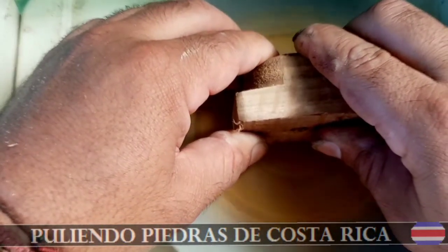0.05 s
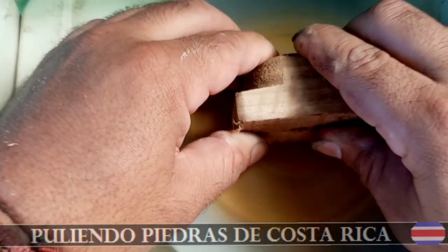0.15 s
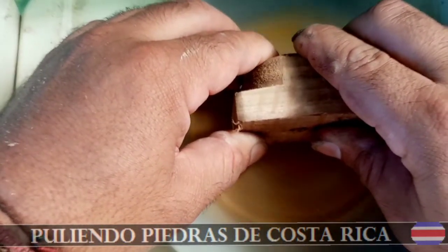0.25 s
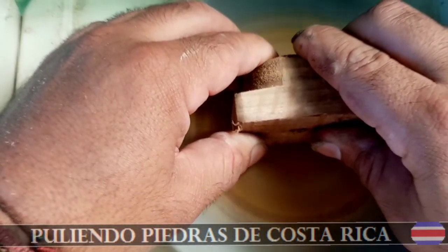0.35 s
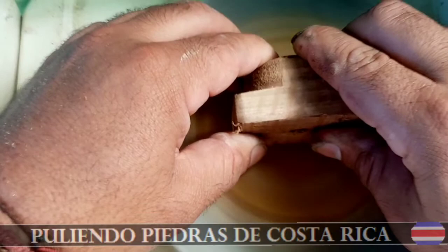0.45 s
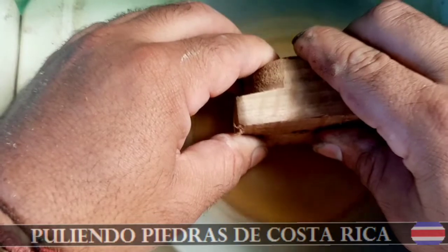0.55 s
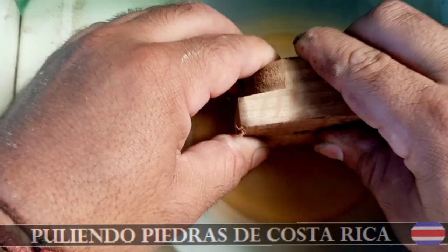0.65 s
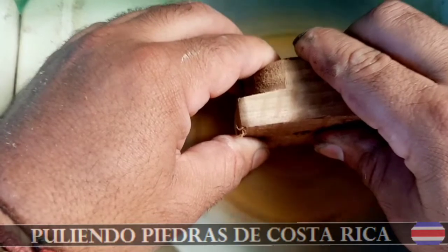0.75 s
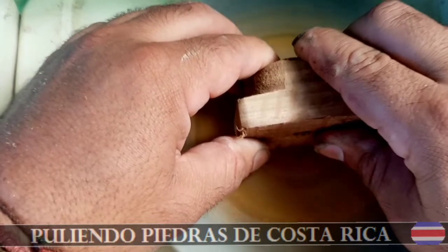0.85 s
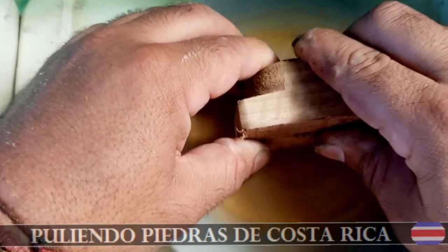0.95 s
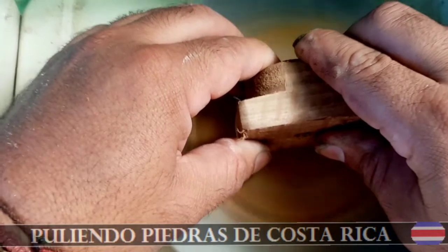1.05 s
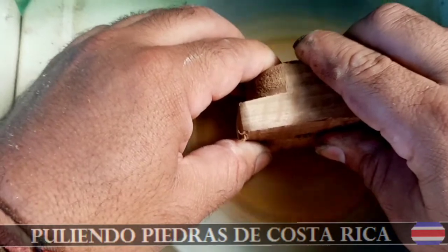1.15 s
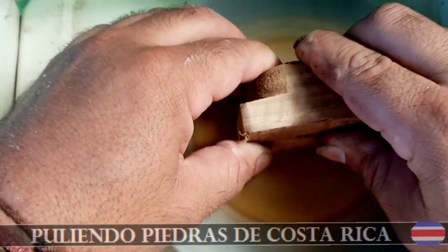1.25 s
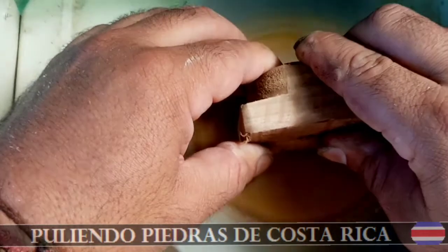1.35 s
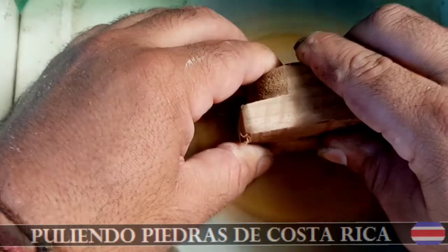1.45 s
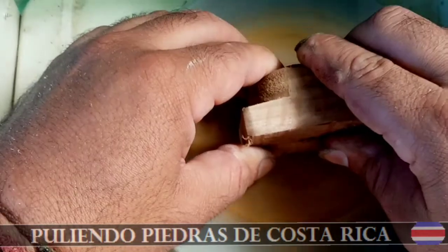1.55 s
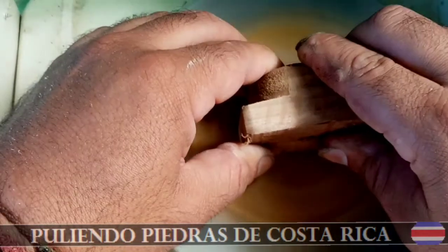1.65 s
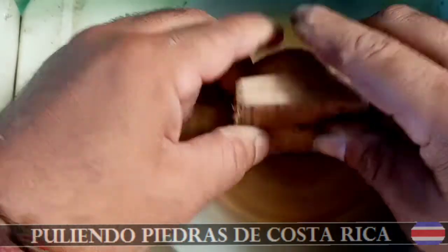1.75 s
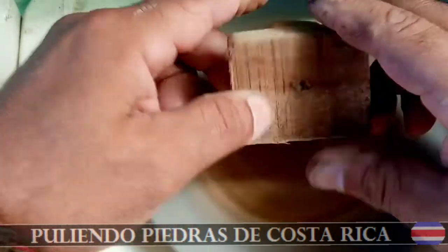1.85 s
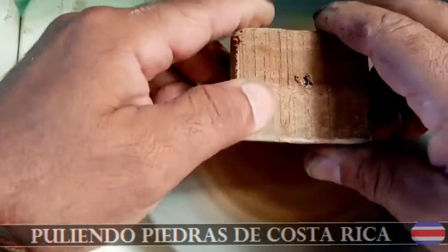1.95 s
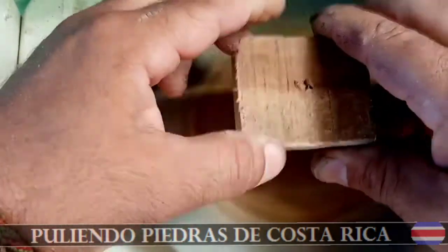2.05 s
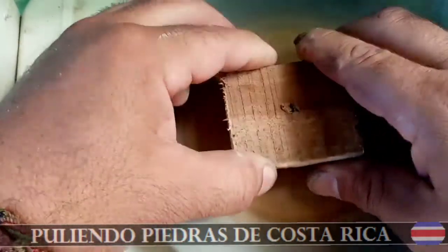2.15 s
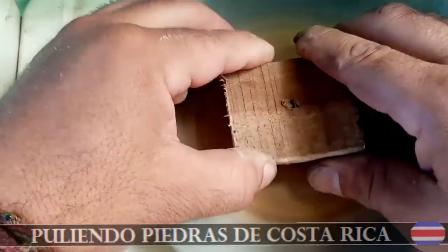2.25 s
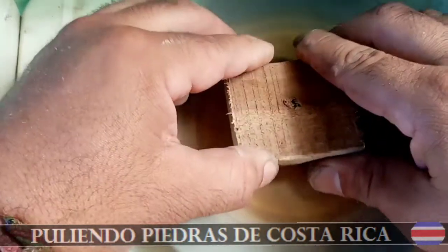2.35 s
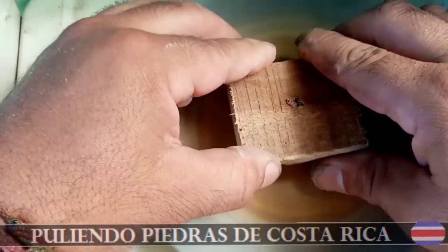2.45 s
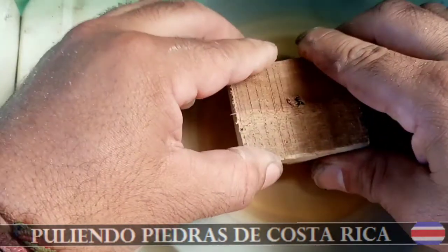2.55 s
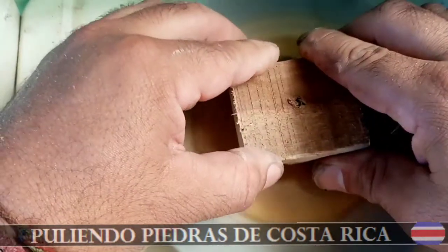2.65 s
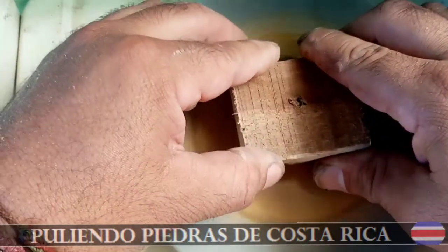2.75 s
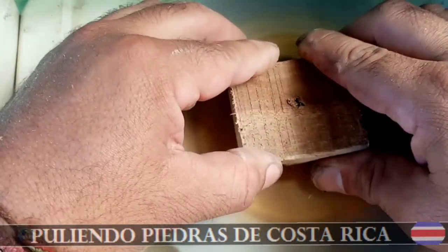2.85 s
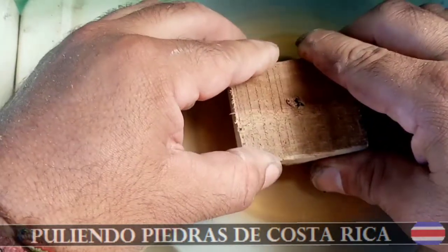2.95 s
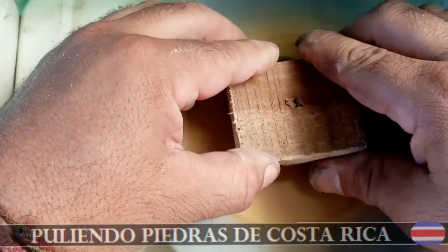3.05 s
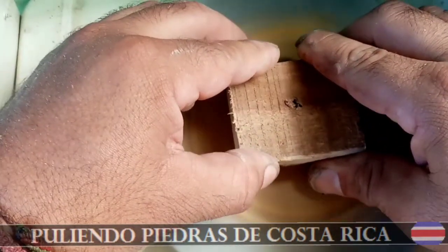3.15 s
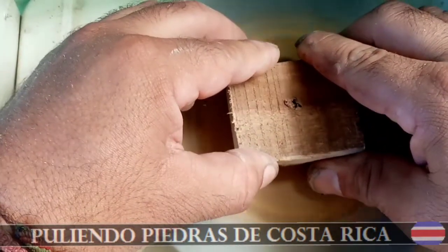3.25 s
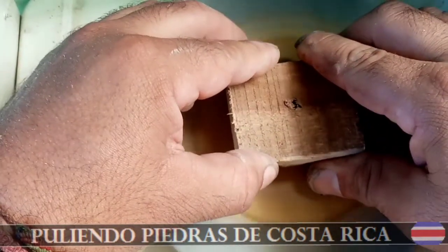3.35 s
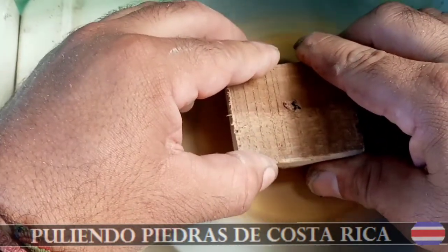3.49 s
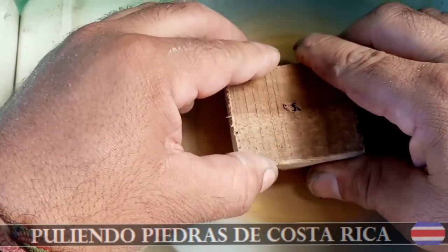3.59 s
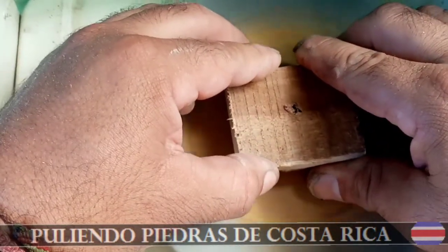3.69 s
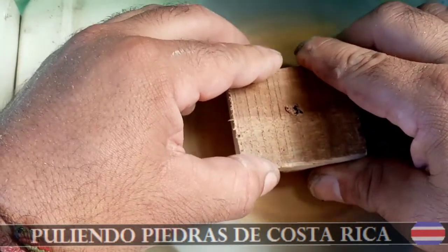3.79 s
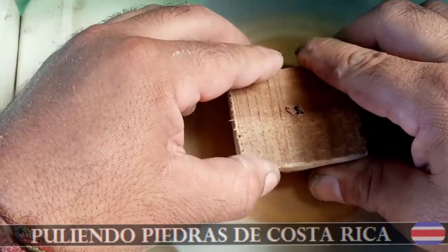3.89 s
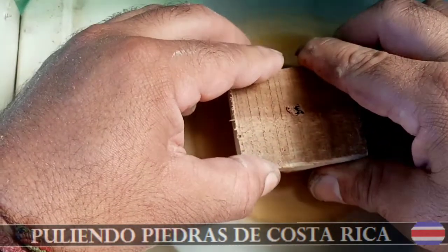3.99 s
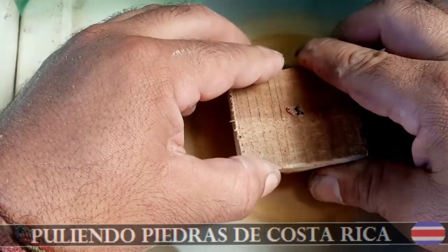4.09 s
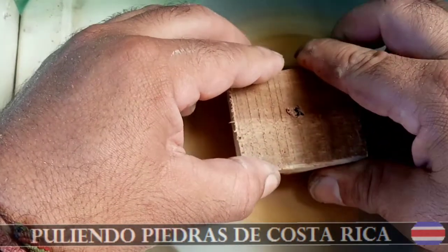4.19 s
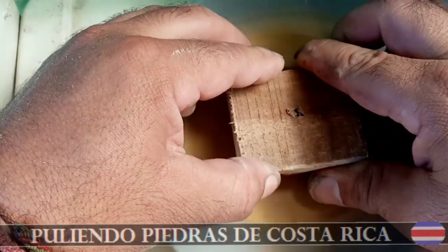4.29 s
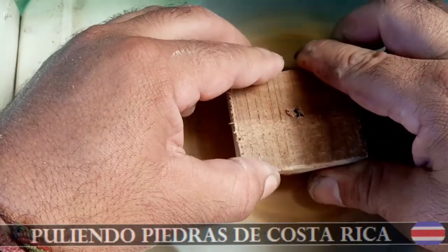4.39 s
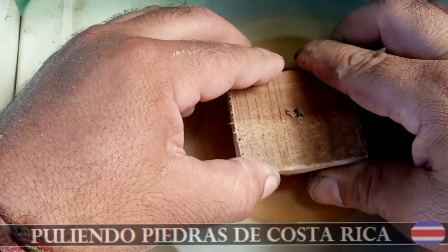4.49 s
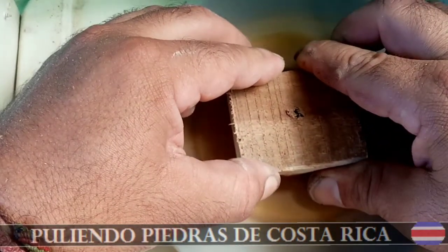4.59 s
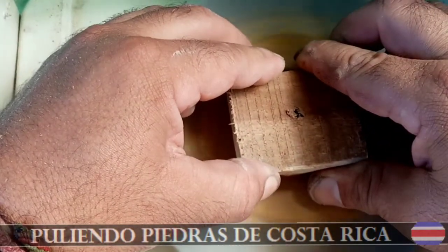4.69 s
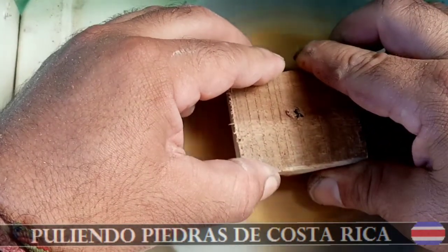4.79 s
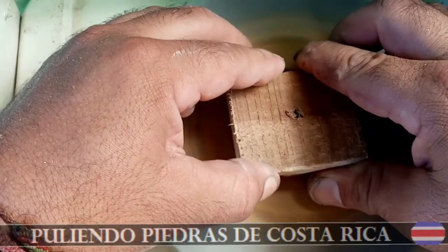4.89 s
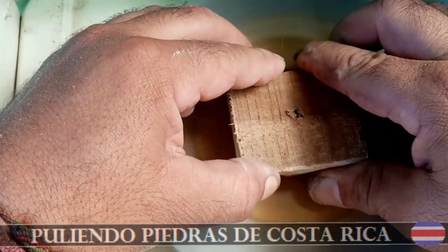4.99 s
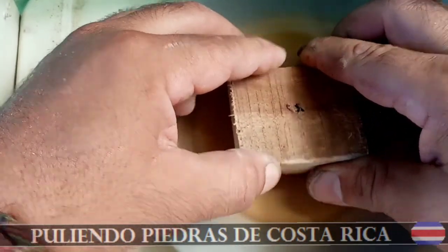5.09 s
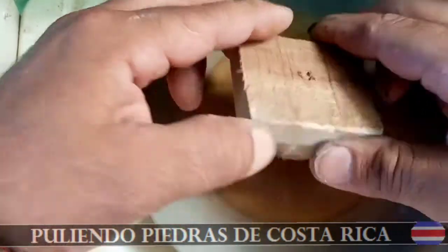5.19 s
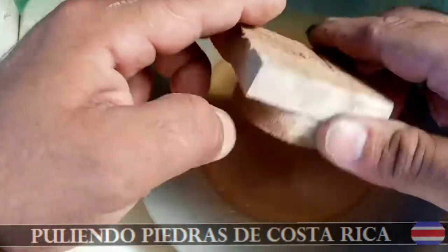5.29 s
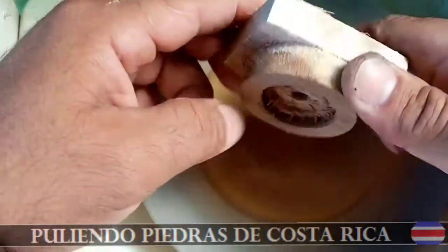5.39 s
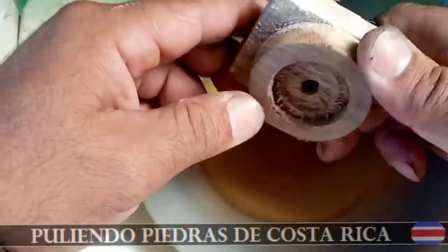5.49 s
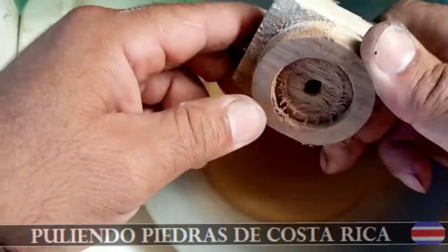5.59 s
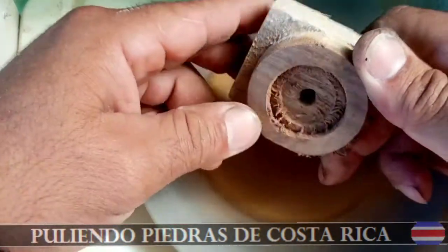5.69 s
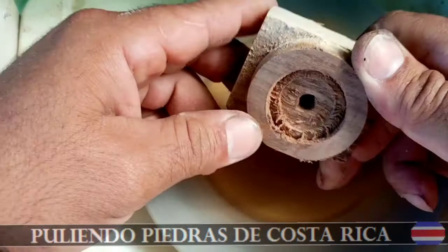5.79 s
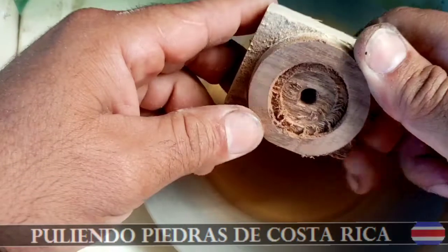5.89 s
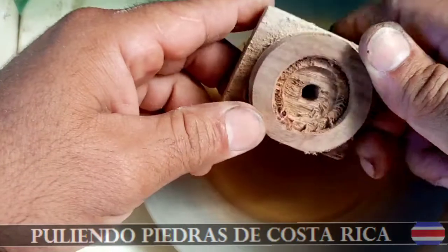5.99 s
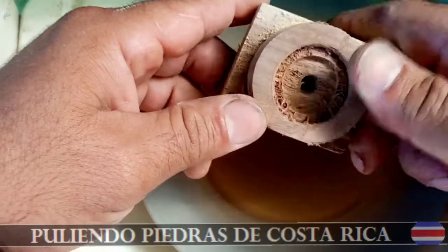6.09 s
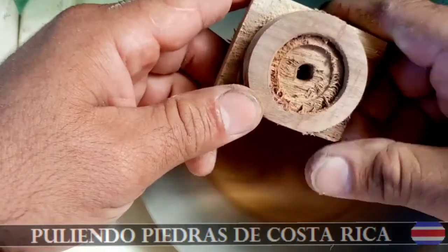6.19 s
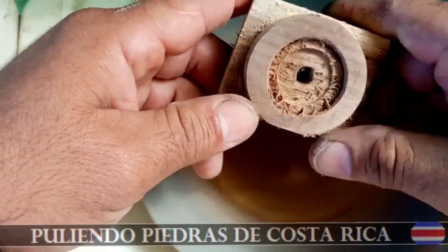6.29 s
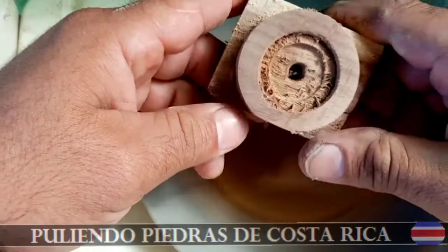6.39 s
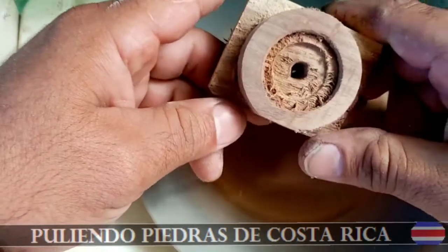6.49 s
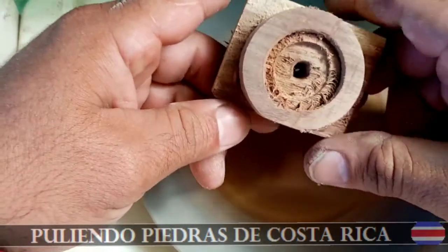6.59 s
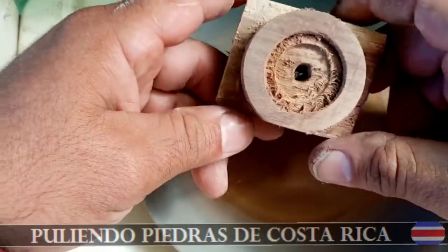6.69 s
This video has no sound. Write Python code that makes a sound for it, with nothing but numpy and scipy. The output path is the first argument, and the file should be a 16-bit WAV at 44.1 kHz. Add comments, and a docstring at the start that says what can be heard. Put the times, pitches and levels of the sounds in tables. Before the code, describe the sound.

Close and dry in a small workshop, a wooden block is already pressed on a coarse spinning disc, giving a steady bright hiss over a low motor growl. It lifts briefly and the motor speeds up, hums fuller and rattles lightly. The block bites again with a rough scrape that settles into hiss with soft hollow knocks, then lifts, leaving the machine running and faint finger brushes on wood.

```python
"""Hollow wooden block on a disc sander

A hollow wooden block is held on a coarse spinning disc, lifted and turned, pressed on again, then lifted for good.
Behind the block: fan air, casing resonances, bearing chatter once a turn, and a growl of shaft orders.
The load slows the motor and changes that growl; grit hisses in the wood as four bands of patchy noise.
Soft hollow knocks come once a turn in short runs, and fingers brush the wood after the last lift.
Taken dry on two microphone ports: the right one is brighter and hears the machine a little later."""
import sys
import numpy as np
from scipy import signal
from scipy.fft import rfft, irfft, next_fast_len
from scipy.io import wavfile
from scipy.ndimage import uniform_filter1d, map_coordinates

SR = 44100
rng = np.random.default_rng(int(sys.argv[2]) if len(sys.argv) > 2 else 0)


def put_to_file(sound):
    """Save the sound as 16-bit audio at rate SR, in the file named by the first command-line argument."""
    columns = np.atleast_2d(sound).T  # one column per channel
    safe = np.clip(columns, -1, 1)
    whole_steps = np.round(safe * 32767)
    wavfile.write(sys.argv[1], SR, whole_steps.astype(np.int16))


N = 297233
T = np.arange(N) / SR  # time in s


def amp(db):
    """Decibels to a linear gain."""
    return 10 ** (np.asarray(db) / 20)


def unit(x):
    """Scale a sound to rms 1."""
    return x / np.sqrt(np.mean(x ** 2) + 1e-20)


def along(points, hz):
    """Read (freq_hz, value) points on a log frequency axis."""
    f, v = np.transpose(points)
    return np.interp(np.log(hz + 1), np.log(f + 1), v)


def curves(rows):
    """One value per sample for each column after the time."""
    s, *cols = np.transpose(rows)
    return [np.interp(T, s, c) for c in cols]


def wobble(rate):
    """A smooth random curve with `rate` knots a second."""
    coarse = T[::int(SR / rate / 20) + 1]
    knots = rng.standard_normal(int(N * rate / SR) + 4)
    return np.interp(T, coarse, map_coordinates(knots, [coarse * rate]))


def filtered(x, response):
    """Pass x through a complex response of frequency."""
    m = next_fast_len(N + SR // 2)
    hz = np.fft.rfftfreq(m, 1 / SR)
    return irfft(rfft(x, m) * response(hz), m)[..., :N]


# Likeness of the noise at the two ports, before their own colour: freq_hz, likeness (0-1)
PORT_LIKENESS = [(30, 0.33), (100, 0.98), (400, .8), (1000, 0.29), (2000, 0.37), (3500, 0.13),
                 (6000, 0.067), (10000, 0.037), (15000, .03)]


def rush(spectrum, patchy_db):
    """Two-port noise of rms 1: random gain patches in time and pitch, shaped by a spectrum."""
    z = signal.stft(rng.standard_normal((2, N)), nperseg=512)[2]
    field = rng.standard_normal(z.shape[1:])
    field = uniform_filter1d(field, size=3, axis=0)
    field = uniform_filter1d(field, size=6, axis=1)
    pair = signal.istft(z * amp(patchy_db * unit(field)), nperseg=512)[1][:, :N]

    def mid_side(hz):
        turn = np.arccos(np.clip(along(PORT_LIKENESS, hz), -1, 1)) / 2
        return amp(along(spectrum, hz)) * np.array([np.cos(turn), np.sin(turn)])

    mid, side = filtered(pair, mid_side)
    return unit(np.array([mid + side, mid - side]))


# Speed of the disc, slower under load: time_s, turns_per_s
DISC_SPEED = [(0, 28.35), (.9, 27.95), (1.55, 28.05), (1.72, 29.75), (2.25, 29.75), (2.45, 29.5),
              (2.62, 28.25), (3, 27.95), (4.1, 27.72), (4.9, 27.35), (5.04, 29.715), (6.74, 29.715)]


def shaft():
    """Angle of the disc in radians, summed from its speed."""
    return 2 * np.pi * np.cumsum(curves(DISC_SPEED)[0]) / SR


LOADED_SPEED, FREE_SPEED = 28.2, 29.7  # turns per s


def freedom():
    """1 when the disc runs free, 0 under load, judged by its speed."""
    return np.clip((curves(DISC_SPEED)[0] - LOADED_SPEED) / (FREE_SPEED - LOADED_SPEED), 0, 1)


MAINS_HZ, MAINS_ORDER = 240, 8  # magnetic pull of the windings and the shaft order next to it


def slipping():
    """Phase of the mains pull against the shaft order next to it."""
    return 2 * np.pi * MAINS_HZ * T - MAINS_ORDER * shaft()


# A crest of the low growl's beat in each free run: time_s
BEAT_CRESTS = [2.03, 5.27]


def swell(lead_s):
    """The slip beat, -1 to 1, counted from the nearest listed crest moved ahead by lead_s."""
    slip = slipping()
    nearest = (T > np.mean(BEAT_CRESTS)) * 1
    crest_phase = np.interp(np.array(BEAT_CRESTS) - lead_s, T, slip)
    return np.cos(slip - crest_phase[nearest])


# Spectrum of air and casing noise, relative: freq_hz, level_db (per Hz)
AIR_SPECTRUM = [(15, -70), (35, -34), (92, -13.5), (210, -10), (349, -8), (468, -12), (862, -20.5),
                (1250, -20.5), (1820, -26.5), (2860, -26.5), (5000, -33.5), (6880, -34.5), (8980, -40),
                (13400, -58), (15300, -51)]
# The free disc shakes the casing less in the bass: freq_hz, gain_db
FREE_COLOUR = [(60, 0), (100, -6), (340, -6), (480, -2), (600, 0)]
# The pressed block stills the casing: freq_hz, gain_db
LOADED_COLOUR = [(60, -1), (250, 2), (380, -3), (520, -7), (700, 0.5), (1100, -3), (1500, 5.5), (2500, -17),
                 (4000, -7)]
# Casing resonances: freq_hz, width_hz, level_db (over the casing level)
CASING_RINGS = [(656.5, 46, -3.5), (888, 35, -8), (1243, 33, -11.5)]
# Common level of air and rings: time_s, level_db
CASING_DB = [(0, -48), (.4, -51.5), (.75, -52.5), (1.25, -51), (1.55, -53), (1.7, -50), (2.35, -48.5),
             (2.5, -51.5), (2.8, -53.5), (4.85, -53.5), (5.1, -50), (6.74, -50)]
# The chatter beats with the low growl, a little ahead
CHATTER_DB, CHATTER_SWELL_DB, CHATTER_LEAD_S = -58, 3, .03
CHATTER_START_DB, CHATTER_BUILD_S = -12, .2  # after a lift it starts low and builds


def bearings():
    """The bearings rattle near 3 kHz, bunched by the turning shaft, when the disc runs free."""
    angle = shaft()
    first_lift, last_lift = TOUCHES[0][1], TOUCHES[1][1]
    from_lift = T - np.where(T < last_lift, first_lift, last_lift)
    level_db = CHATTER_DB + CHATTER_SWELL_DB * swell(CHATTER_LEAD_S)
    level_db = level_db + CHATTER_START_DB * np.exp(-np.abs(from_lift) / CHATTER_BUILD_S)
    turn_db = 6 * np.cos(angle) + 2 * np.cos(2 * angle)
    turn_db = turn_db + 2.5 * np.cos(4 * angle) + 2.5 * np.cos(6 * angle + 1.2)
    beat = amp(turn_db + .8 * wobble(12))
    noise = rush([(2000, -40), (2600, -5), (3000, -3), (3500, -2.5), (4500, -39)], patchy_db=-0.5)
    return freedom() * amp(level_db) * unit(beat * noise)


def housing():
    """Fan air and casing resonances jolted on each turn; the load changes the colour of the air."""
    angle, free = shaft(), freedom()
    casing_db, = curves(CASING_DB)
    rings = 0
    for hz, width_hz, ring_db in CASING_RINGS:
        jolts = amp(1.3 * np.cos(angle + hz) + 1.8 * wobble(4.51))  # hz only scatters the phase
        band = [(hz - 4 * width_hz, -40), (hz, 0), (hz + 4 * width_hz, -40), (hz * 3, -120)]
        rings = rings + amp(ring_db) * unit(jolts * rush(band, patchy_db=-2.0))
    air = amp(7 + 1.06 * np.cos(angle)) * rush(AIR_SPECTRUM, patchy_db=2.5)
    free_air = filtered(air, lambda hz: amp(along(FREE_COLOUR, hz)))
    loaded_air = filtered(air, lambda hz: amp(along(LOADED_COLOUR, hz)))
    air = free * free_air + (1 - free) * loaded_air
    return amp(casing_db) * (air + rings)


# Growl levels before the slow beat: time_s, low_growl_db, upper_growl_db
GROWL_DB = [(0, -49, -46), (.35, -51, -44), (.68, -51.5, -47.5), (.76, -48.5, -45), (1.25, -50, -43),
            (1.5, -48, -52.5), (1.62, -49, -40.5), (1.9, -40, -38), (2.05, -40.5, -40.5),
            (2.2, -44.5, -41.5), (2.7, -45, -43), (2.8, -50, -43), (4.3, -58.5, -42.5), (4.88, -56, -46.5),
            (5.2, -41, -38.5), (5.8, -44, -39.5), (6.74, -43.5, -39)]
# Balance of shaft orders under the first face: multiple, level_db (relative)
FIRST_FACE_ORDERS = [(1, -31), (2, -18), (3, -4.5), (4, -6), (5, 3), (6, -17), (7, -9.5), (8, -2.5),
                     (9, -13.5), (10, -26), (11, -11), (12, -11), (13, -14.5), (14, -14.5)]
# Balance of shaft orders running free: multiple, level_db (relative)
FREE_ORDERS = [(1, -35), (2, -21), (3, -10), (4, -2), (5, -1), (6, -2), (7, 0), (8, -1), (9, -6), (10, -7),
               (11, -8), (12, -7), (13, -13), (14, -21)]
# Balance of shaft orders under the second face: multiple, level_db (relative)
SECOND_FACE_ORDERS = [(1, -30.5), (2, -29), (3, -13), (4, -7), (5, -5.5), (6, -7.5), (7, -1.5), (8, 4.5),
                      (9, -14), (10, -40), (11, -35), (12, -11.5), (13, -18), (14, -36)]
# The neighbour of each order: multiple, relative_strength (0-1), cancelling_s (time of one cancelling)
NEIGHBOURS = [(1, .3, 5.3), (2, .3, 5.3), (3, 0.2, 5.35), (4, 0.44, 5.44), (5, 0.5, 5.6), (6, 0.25, 5.5),
              (7, 0, 5.55), (8, 0.37, 5.32), (9, 0.7, 5.19), (10, 0.9, 5.33), (11, 0.5, 5.7),
              (12, 0.8, 5.56), (13, 0.74, 5.42), (14, 1, 5.3)]
TURNED_S = 1.9  # when the block is turned over
SWELL_FREE_DB, SWELL_LOADED_DB = 2, 1.5  # depth of the low growl's beat
UPPER_SWELL_DB, UPPER_LEAD_S = 1.1, .26  # the upper growl beats too, ahead of the low one


def evened(x):
    """Divide a sound by its own running rms over 40000 samples."""
    return x / np.sqrt(np.abs(uniform_filter1d(x * x, size=40000)) + 1e-9)


def growl():
    """Shaft orders, each beside a neighbour set by the mains pull chopped by each turn.

    The pair beats slowly when the disc runs free and throbs fast when the load makes the motor slip.
    """
    low_db, high_db = curves(GROWL_DB)
    loose, angle, slip = freedom(), shaft(), slipping()
    on_first = (1 - loose) * (T < TURNED_S)
    on_second = (1 - loose) * (T >= TURNED_S)
    swell_db = SWELL_LOADED_DB + (SWELL_FREE_DB - SWELL_LOADED_DB) * loose
    low_db = low_db + swell_db * swell(0)
    high_db = high_db + UPPER_SWELL_DB * loose * swell(UPPER_LEAD_S)
    unrest = 1 - .6 * loose  # cleaner lines when the disc runs free
    low, high = 0, 0
    orders = zip(FIRST_FACE_ORDERS, FREE_ORDERS, SECOND_FACE_ORDERS, NEIGHBOURS)
    for first, free, second, (k, strength, cancelling_s) in orders:
        db = on_first * first[1] + loose * free[1] + on_second * second[1]
        depth = strength * (0.67 + 0.17 * loose)
        pair = 1 - depth * np.exp(1j * (slip - np.interp(cancelling_s, T, slip)))
        shared_drift = .35 * wobble(6)
        port_drift = .3 * np.array([wobble(9), wobble(9)])
        phase = round(k) * angle + .45 * k * k + unrest * (shared_drift + port_drift)
        tone = amp(db + 2.2 * unrest * wobble(8)) * np.real(pair * np.exp(1j * phase))
        if k < 6.5:
            low = low + tone
        else:
            high = high + tone
    return amp(low_db) * evened(low) + amp(high_db) * evened(high)


# Fingers on wood: centre_s, length_s, level_db
FINGER_RUBS = [(5.55, .03, -74), (5.62, .04, -65), (5.8, .04, -63), (6.005, .08, -58), (6.09, .03, -72),
               (6.32, .035, -61), (6.41, .02, -74)]


def fingers():
    """Skin slides over the rough block: short bright brushes of noise."""
    strokes = sum(amp(db) * np.exp(-((T - s) / length * 2.2) ** 2) for s, length, db in FINGER_RUBS)
    bright = [(4000, -30), (7000, -3), (10000, -6), (13300, -10), (15000, -5)]
    return strokes * rush(bright, patchy_db=2.5)


# Short runs of one knock a turn: first_s, knocks, level_db (before scatter)
KNOCK_RUNS = [(1.245, 2, -38), (1.495, 1, -44), (1.665, 1, -40), (2.372, 2, -43.5), (3.558, 2, -48),
              (3.666, 2, -43.5), (3.773, 2, -41.5), (3.845, 2, -47.5), (3.917, 2, -44.5), (4.022, 2, -43.5),
              (4.132, 2, -42), (4.24, 2, -44), (4.315, 2, -46), (4.422, 2, -52), (4.571, 1, -44.5),
              (4.642, 1, -51), (4.747, 2, -47), (4.857, 1, -51)]
HOLLOW_HZ, KNOCK_SCATTER_DB = 877, 1  # centre pitch and random level spread


def knocks():
    """A high spot of the disc squeezes past the block once a turn; its hollow gives a soft short note."""
    notes = np.zeros(N)
    t = np.arange(-600, 1200) / SR
    turns = shaft() / (2 * np.pi)
    swelling = np.exp(-(t / np.where(t < 0, .005, .008)) ** 2)
    for first_s, count, db in KNOCK_RUNS:
        knock_turns = np.interp(first_s, T, turns) + np.arange(round(count))
        times = np.interp(knock_turns, turns, T)
        luck = rng.standard_normal((len(times), 2))
        levels = amp(db + KNOCK_SCATTER_DB * luck[:, 0])
        pitches = HOLLOW_HZ * (1 + 0.022 * luck[:, 1])
        for at, level, hz in zip(times, levels, pitches):
            note = level * swelling * np.sin(2 * np.pi * hz * t)
            notes[round(at * SR) - 600:][:len(t)] += note
    return notes


# The block on the disc: touch_s, lift_s, scrape_db, rasp_db, dust_db,
# then changes on a fresh rough face: fresh_scrape_db, fresh_rasp_db, fresh_dust_db
TOUCHES = [(-1, 1.595, -43, -33.5, -25, 0, 0, 0), (2.158, 4.96, -46.5, -33, -25.5, 15, 10.5, -6)]
# Hiss while the block is held on: time_s, level_db
HISS_DB = [(0, -24.5), (.19, -25), (.24, -26.5), (.45, -24.5), (1.2, -27), (1.5, -26.5), (1.59, -25.5),
           (2.18, -31.5), (2.3, -28.5), (2.5, -23.5), (2.75, -23), (3.5, -25), (3.65, -27.5), (4.4, -28),
           (4.9, -28), (4.96, -27.5)]
USUAL_HISS_DB = -26
SCRAPE_FOLLOWS, RASP_FOLLOWS, DUST_FOLLOWS = .6, .35, .12  # dB per dB of hiss
BITE_DB_PER_S, LIFT_DB_PER_S = 900, 410  # how fast the sound comes on touch and goes on lift
EDGE_S, EDGE_DB = .025, 1.5  # the last edge drags on after the face has left, and scrapes louder
SCRAPE_WEARS_S, RASP_WEARS_S = .11, 0.14  # roughness peaks this long after the touch
DUST_BUILDS_S = 0.4  # fine dust comes slowly


def contact():
    """Gains of hiss, scrape, rasp and dust as each touch bites, wears in and lifts."""
    hiss_db, = curves(HISS_DB)
    push_db = hiss_db - USUAL_HISS_DB
    gains = 0
    for touch, lift, scrape_db, rasp_db, dust_db, fresh_scrape_db, fresh_rasp_db, fresh_dust_db in TOUCHES:
        on = np.maximum(T - touch, 0)

        def held(end):
            bite_db = np.minimum(0, BITE_DB_PER_S * (T - touch - .02))
            return bite_db - LIFT_DB_PER_S * np.maximum(T - end, 0)

        def rough(s):
            return on / s * np.exp(1 - on / s)

        edge_db = EDGE_DB * np.exp(-((T - lift - EDGE_S) / EDGE_S) ** 2)
        hiss = hiss_db + held(lift)
        scrape = scrape_db + SCRAPE_FOLLOWS * push_db + fresh_scrape_db * rough(SCRAPE_WEARS_S)
        scrape = scrape + edge_db + held(lift + EDGE_S)
        rasp = rasp_db + RASP_FOLLOWS * push_db + fresh_rasp_db * rough(RASP_WEARS_S)
        rasp = rasp + held(lift + EDGE_S / 2)
        dust = dust_db + DUST_FOLLOWS * push_db + fresh_dust_db * np.exp(-on / DUST_BUILDS_S)
        dust = dust + held(lift)
        gains = gains + amp([hiss, scrape, rasp, dust])
    return gains


# Spectrum of the low scrape, relative: freq_hz, level_db (per Hz)
SCRAPE_SPECTRUM = [(710, -36), (1200, -13.5), (1380, -23.5), (1450, -3.5), (1760, -3), (1970, -1.5),
                   (2160, -1), (2500, 4), (3250, -26), (5500, -120)]
# Spectrum of the mid rasp, relative: freq_hz, level_db
RASP_SPECTRUM = [(1530, -52), (2600, -7), (2780, -3), (3200, 0), (3510, 1), (4020, 0), (4480, -2.5),
                 (5000, -7.5), (6500, -6.5), (11000, -120)]
# Spectrum of the high hiss, relative: freq_hz, level_db
HISS_SPECTRUM = [(2650, -42), (4500, -7), (6400, -0.5), (7760, -4), (8200, -5), (10700, -25.5),
                 (18000, -120)]
# Spectrum of the fine dust, relative: freq_hz, level_db
DUST_SPECTRUM = [(4590, -36), (7800, -10), (8900, 0.5), (9650, -2.5), (11900, -7), (13300, -11),
                 (14900, -0.5), (15500, -5)]
# Resonances and hollows of the block, one list for each face: freq_hz, width_hz, lift_db
FACE_MODES = [
    [(1900, 70, 5), (2520, 220, -11), (2800, 150, 4), (3150, 150, 3), (3890, 50, 4), (5580, 70, 5),
     (5850, 110, 5), (6220, 60, 4), (6550, 200, 6), (6900, 200, -3), (7590, 120, 4), (8350, 130, 5),
     (8690, 130, 5), (9830, 60, 3), (14600, 110, 3), (15300, 160, 3)],
    [(2050, 200, 3), (2520, 220, -11), (3200, 90, 5), (4160, 80, 3), (4550, 200, -3), (5580, 110, 4),
     (6150, 200, 3), (7050, 190, 3), (8930, 110, 3), (11900, 600, 2), (15350, 250, 4)],
]


def block_body(cut, modes):
    """Colour the cut by the block's resonances (lifts) and hollows (dips)."""
    def response(f):
        return amp(sum(db / (1 + (2 * (f - hz) / width) ** 2) for hz, width, db in modes))
    return filtered(cut, response)


def sanding():
    """Grit tears the fibres; the disc runs a little out of true, so the bite throbs once and twice a turn."""
    hiss, scrape, rasp, dust = contact()
    angle = shaft()
    throb_db = 0.54 * np.cos(angle) + .5 * np.cos(2 * angle + 2.4) + .2 * np.cos(5 * angle)
    bite = amp(throb_db + 0.51 * wobble(12))
    grit = amp(0.53 * wobble(900))  # coarse grains catch one after another
    layers = scrape * rush(SCRAPE_SPECTRUM, patchy_db=1.8)
    layers = layers + rasp * rush(RASP_SPECTRUM, patchy_db=1.25)
    layers = layers + hiss * rush(HISS_SPECTRUM, patchy_db=1.0)
    layers = layers + dust * rush(DUST_SPECTRUM, patchy_db=1.66)
    cut = bite * grit * layers
    turned = T >= TURNED_S
    return block_body(cut * ~turned, FACE_MODES[0]) + block_body(cut * turned, FACE_MODES[1])


def scene():
    """The machine behind, the hands and the wood in front."""
    return housing() + bearings() + growl() + fingers() + knocks() + sanding()


# Colour of the microphone ports: freq_hz, left_over_right_db
PORT_COLOUR = [(60, -5), (110, -5.5), (200, -2.5), (380, -4), (700, -1.0), (1290, -5.5), (2380, -1),
               (4400, -3), (8120, -4.5), (15000, -23.5)]
LAG = 44  # samples by which the right port is late
TOP_HZ = 15500  # band limit


def record(dry):
    """Each port has its own colour, the right one is late, and nothing passes above the band limit."""
    def response(hz):
        half_db = along(PORT_COLOUR, hz) / 2
        late = np.exp(-2j * np.pi * hz * LAG / SR)
        ports = np.array([amp(half_db), amp(-half_db) * late])
        ports = ports / np.sqrt(np.cosh(half_db * np.log(10) / 10))  # keeps the summed power of the two
        edge = np.sin(np.pi / 2 * np.clip((TOP_HZ + 60 - hz) / 80, 0, 1)) ** 2
        return ports * edge
    return filtered(dry, response)


dry = scene()
out = record(dry)
put_to_file(out)
```